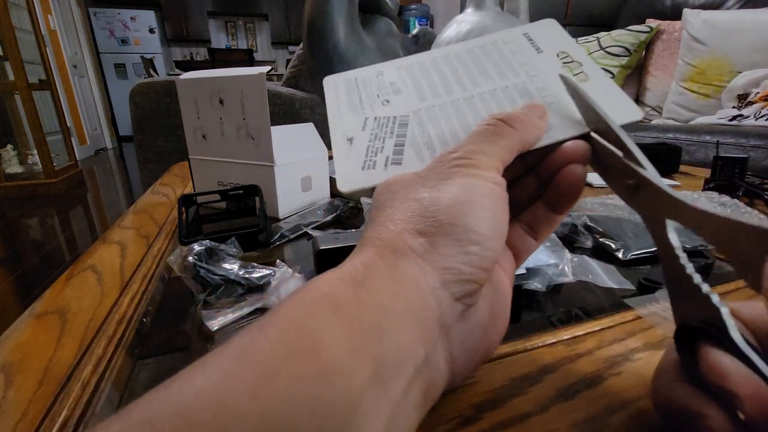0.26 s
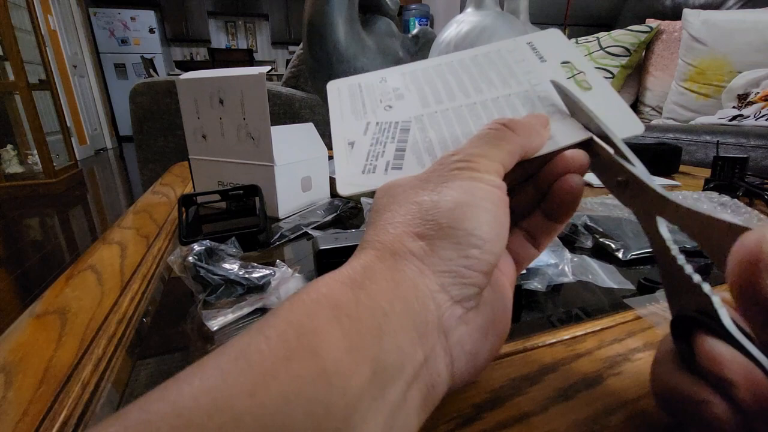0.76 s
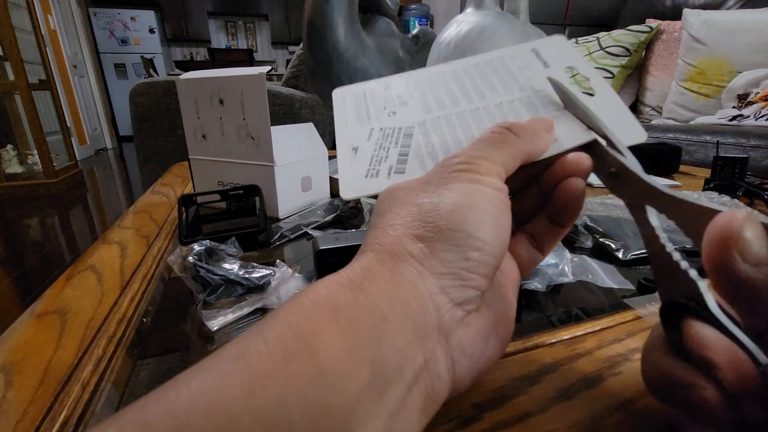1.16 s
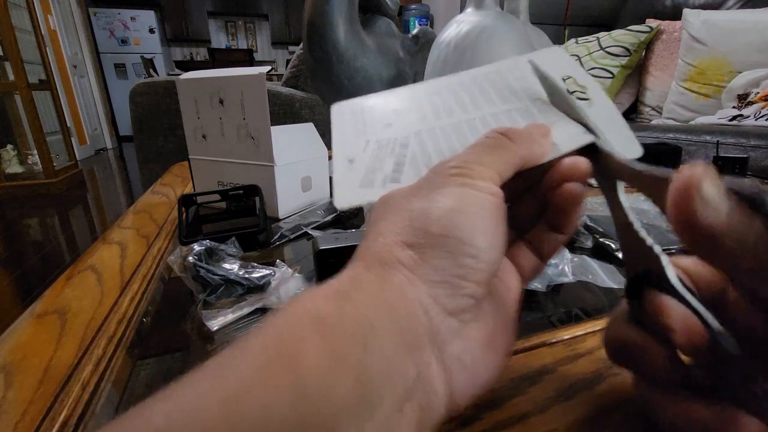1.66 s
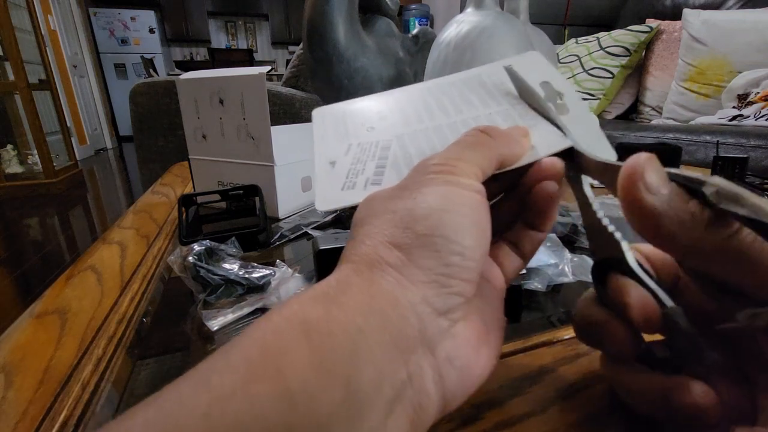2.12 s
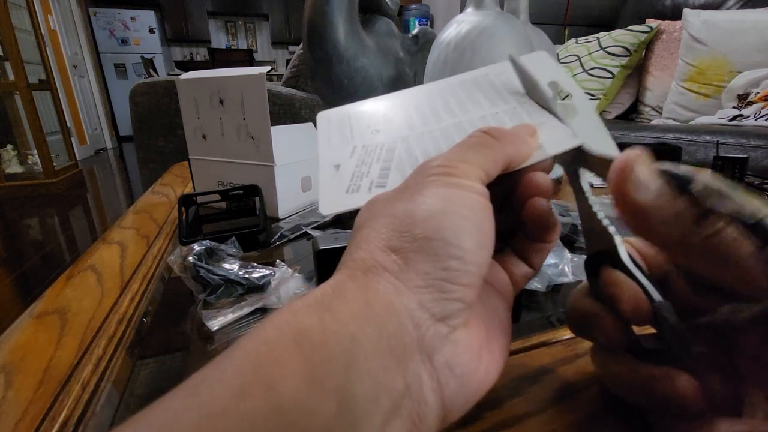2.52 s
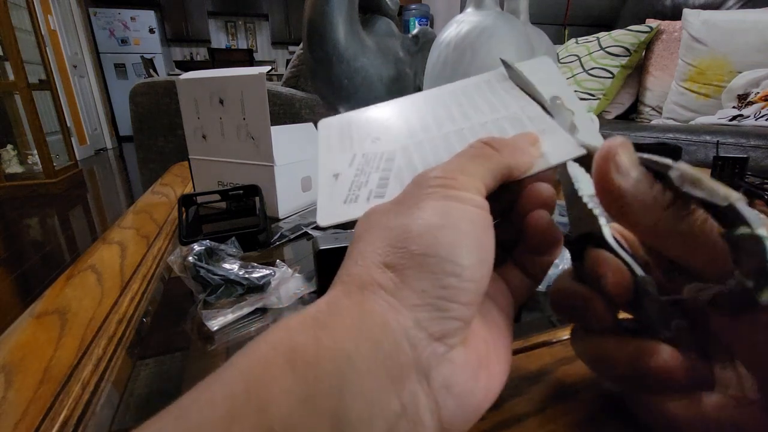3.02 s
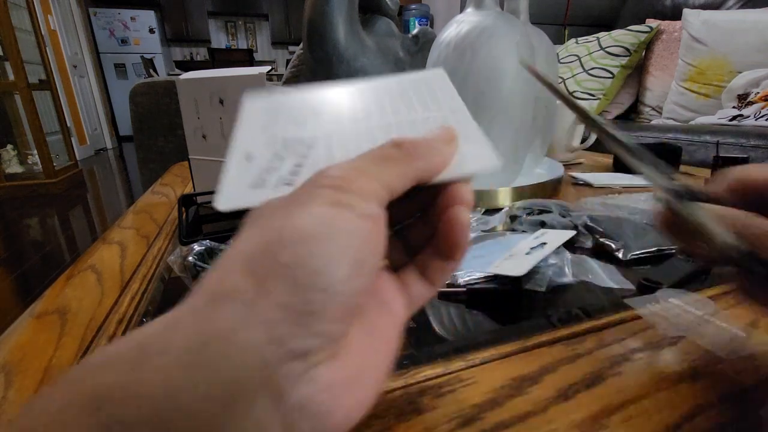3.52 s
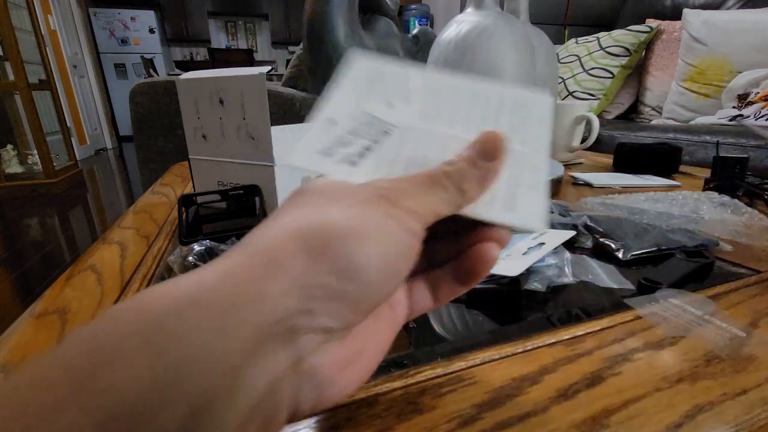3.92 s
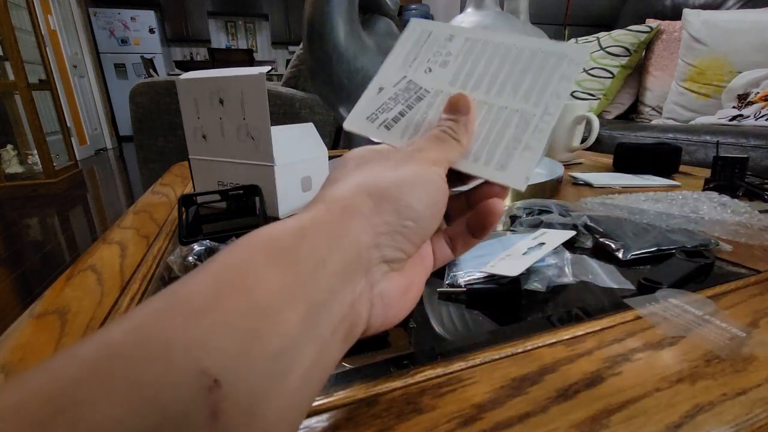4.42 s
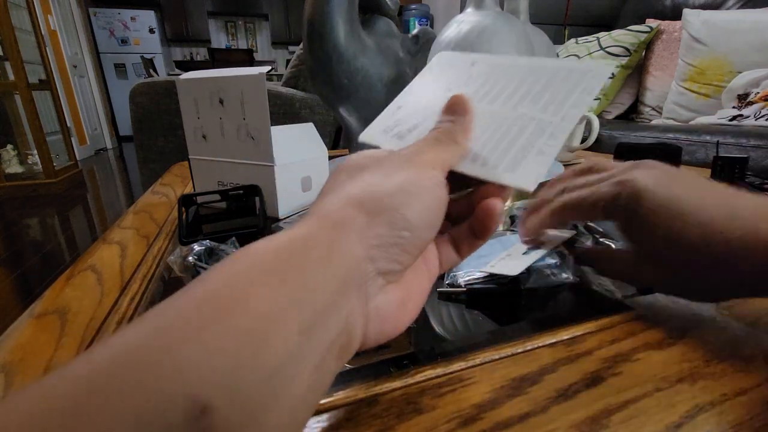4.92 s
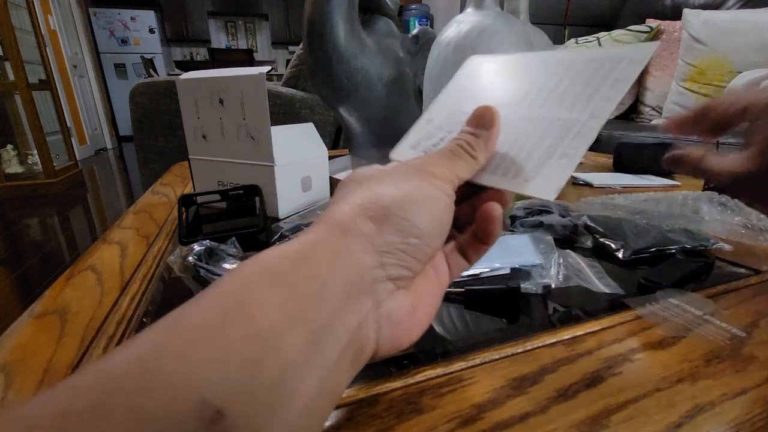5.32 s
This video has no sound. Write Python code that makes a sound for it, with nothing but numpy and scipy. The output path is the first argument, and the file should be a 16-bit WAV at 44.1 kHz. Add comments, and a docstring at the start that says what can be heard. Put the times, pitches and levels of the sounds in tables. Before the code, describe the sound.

A close stereo microphone in a quiet living room, with very low room tone throughout. A faint wrapper crackle comes at the start. From about 0.25 s shears chafe against a card-and-plastic package in dry, gritty bursts, quiet at first. Between about 0.9 and 3.15 s seven short closing strokes creak and rasp like a rapid buzzing tear, alternating with scratchy, slightly squeaky opening scrapes; soft low lurches lie beneath. The stroke near 2.3 s is slower and fainter. At 3.25 s the last fibres part in a hard, bright snap, with card crackle and sliding hands just after. Faint rustles and light touches follow until about 4.4 s. From 4.5 to 4.65 s the shears drop onto the wooden table in a quick, rattling clatter, strongest near 4.58 s. Crisp plastic rummaging bursts out from 4.9 to 5.1 s, then brief crackles, knocks and a brushing sound come around 5.4-5.5 s.

```python
"""A quiet living room, a stereo microphone close to a wooden table; room tone lies under the whole take.
A wrapper crackle comes first, then kitchen shears work through a card-and-plastic package: opening strokes
chafe in bursts of gritty noise, closing strokes creak in stick-slip pulses, and soft low lurches lie under both.
The last stroke snaps through as a few clicks into bright rings, and hands slide over card and wrappers.
The shears drop on the table, striking its decaying modes, and a hand rummages among plastic wrappers."""
import sys
import numpy as np
from scipy import signal
from scipy.fft import rfft, irfft
from scipy.io import wavfile
from scipy.ndimage import uniform_filter1d

SR = 44100
rng = np.random.default_rng(int(sys.argv[2]) if len(sys.argv) > 2 else 0)


def how_loud(loudness_db):
    """Turn decibels into a plain amplitude multiplier (0 dB gives 1, 20 dB gives 10)."""
    steps = np.asarray(loudness_db, float) / 20
    return 10 ** steps


def log_audio(samples):
    """Write samples as a 16-bit WAV file to the path given in sys.argv[1]."""
    # one column per channel
    frames = np.atleast_2d(samples).T
    # limit to full scale, then quantise
    limited = np.clip(frames, -1, 1)
    pcm = np.round(limited * 32767).astype(np.int16)
    wavfile.write(sys.argv[1], SR, pcm)


N = 245637

# colour of card and plastic being rubbed or torn: pitch_hz [Hz], level_db [dB per Hz, relative]
RUB_COLOUR = [(240, -40), (400, -3), (648, -13), (858, -7.5), (1270, -11), (1600, -7.5), (1960, -9.5),
              (2510, -7.5), (3700, -1.5), (4500, -5.5), (5800, -4.5), (6900, -15), (8850, -34.5),
              (15000, -22), (15700, -33), (16500, -47)]


def in_time(tables):
    """Tables of (time in s, value, ..) to a gate that is open inside them and one curve per column."""
    t = np.arange(N) / SR
    times_s, *columns = np.vstack(tables).T
    inside = sum((t >= rows[0][0]) & (t <= rows[-1][0]) for rows in tables)
    gate = uniform_filter1d(inside * 1.0, size=20)
    return gate, [np.interp(t, times_s, column) for column in columns]


def rms_one(x):
    """Scale to rms 1."""
    return x / np.sqrt(np.mean(x ** 2) + 1e-20)


def evened(x):
    """Hold the level at rms 1 over 15 ms."""
    return x / np.sqrt(uniform_filter1d(x ** 2, size=660) + 1e-12)


def band(x, low_hz, high_hz):
    """Butterworth band-pass."""
    sos = signal.butter(2, [low_hz, high_hz], "band", fs=SR, output="sos")
    return signal.sosfilt(sos, x + 1e-18)


def coloured(x, spectrum):
    """Weight noise with a spectrum of (Hz, dB), drawn straight over log frequency."""
    hz, level_db = np.transpose(spectrum)
    bin_hz = np.arange(N // 2 + 1) * SR / N + 1      # 1 Hz up, to keep the log finite
    return irfft(rfft(x) * how_loud(np.interp(np.log(bin_hz), np.log(hz), level_db)), N)


def resonances(x, peaks):
    """Parallel resonators (Hz, width in Hz, dB), signs alternating."""
    out = 0
    for k, (hz, width_hz, level_db) in enumerate(peaks):
        r = np.exp(-np.pi * width_hz / SR)
        a = [1, -2 * r * np.cos(2 * np.pi * hz / SR), r * r]
        ring = signal.lfilter([(1 - r * r) / 2, 0, (r * r - 1) / 2], a, x + 1e-18)
        out = out + (-1) ** k * how_loud(level_db) * ring
    return out


def decay(x, time_s):
    """Let each pulse die out exponentially."""
    return signal.lfilter([1], [1, -np.exp(-1 / (time_s * SR))], x)


def swell_and_die(x, time_s):
    """Let each pulse build up and die away, peaking after about time_s."""
    slow = np.exp(-1 / (time_s * SR))
    return signal.lfilter([3 * (1 - slow)], [1, -2 * slow, slow ** 2], x + 1e-18)


def grit(per_s, spread_db, smooth):
    """Random clicks of uneven size over some smooth noise."""
    sizes = how_loud(spread_db * np.minimum(rng.exponential(1, N), 4)) * rng.choice([-1, 1], N)
    clicks = rms_one(sizes * (rng.random(N) < per_s / SR))
    return rms_one(clicks + smooth * rng.standard_normal(N))


def friction(per_s, spread_db, smooth, ring_db):
    """Grit with the colour of the rubbing; until the shears are through it also sings in the blade modes."""
    # blade modes: pitch_hz [Hz], width_hz [Hz], level_db [dB]
    blade_modes = [(1210, 82, -7), (1735, 120, 3), (2800, 67, -22.5), (3400, 490, 7.5), (3950, 600, -11),
                   (5430, 130, -13.5)]
    cut_through_s = 3.25
    noise = coloured(grit(per_s, spread_db, smooth), RUB_COLOUR)
    cutting = np.arange(N) < cut_through_s * SR
    return rms_one(noise) + cutting * how_loud(ring_db) * rms_one(resonances(noise, blade_modes))


def bursts(rows, fall_ms, high_db):
    """Each friction burst swells while an edge drags and dies when it lets go; fall_ms is the time to drop 12 dB."""
    out = np.zeros(N)
    lead = SR // 25      # samples ahead of the peak
    ms = np.arange(-lead, SR // 15) * 1000 / SR
    noise = friction(9000, 2.5, .8, 0.0)
    mid = evened(band(noise, 1900, 5500))
    high = evened(band(noise, 4500, 20000))
    low = evened(band(band(friction(9000, 2.5, .8, 7.0), 800, 2200), 800, 2200))
    for peak_s, peak_db, low_db, rise_ms in rows:
        start = round(peak_s * SR) - lead
        at = slice(start, start + len(ms))
        burst = low[at] * how_loud(low_db) + mid[at] + high[at] * how_loud(high_db)
        burst = burst / np.sqrt(1 + how_loud(2 * low_db) + how_loud(2 * high_db))
        drop_db = np.where(ms < 0, 12 * (ms / rise_ms) ** 2, 12 * ms / fall_ms)
        out[at] += how_loud(peak_db) * burst * how_loud(-drop_db)
    return out


def rub(hiss, drag):
    """Dense fine grit in two bands, each following its own level curve."""
    noise = friction(4000, 3.0, 1, -8.0)
    return hiss * rms_one(band(noise, 2000, 17000)) + drag * rms_one(band(noise, 400, 2000))


def air():
    """Room tone: steady noise, partly shared by both microphones in the bass, separate above."""
    # room tone colour: pitch_hz [Hz], level_db [dB per Hz, relative]
    tone = [(15, -9.5), (25, -33.5), (43, -12.5), (118, -7.5), (192, -19.5), (232, -14.5), (389, -10),
            (538, -22.5), (687, -17.5), (4240, -31), (6040, -31), (7920, -54.5), (16500, -39.5)]
    shared, left, right = rng.standard_normal((3, N))
    b, a = signal.butter(1, 300, fs=SR)
    sides = []
    for own in (left, right):
        spectrum = rfft(1.1 * signal.lfilter(b, a, shared) + own)
        flat = irfft(spectrum / np.sqrt(uniform_filter1d(abs(spectrum) ** 2, size=200)), N)
        sides.append(coloured(flat, tone))
    return how_loud(-64) * rms_one(np.array(sides))


def crackles():
    """Card and wrappers crackle when handled: short bursts, strong above 4.5 kHz."""
    # crackles: peak_s [s], level_db [dB], body under 2.2 kHz low_db [dB re middle], rise_ms [ms over 12 dB]
    crackle_rows = [(0.0772, -58, -26, 1.2), (3.3551, -44, 0, 8.0), (3.3768, -31, -7.5, 9),
                    (3.5112, -46.5, 1.5, 3.3), (4.0545, -49.5, 8, 3.1), (4.0924, -52.5, 11, 4.1),
                    (4.1367, -48.5, 1, 0.65), (4.3547, -50, -4.5, 2.4), (4.4051, -50.5, 4, 1.6),
                    (4.796, -48, -14.5, 1), (4.8968, -40.5, -6, 1.4), (4.9046, -46, 4.5, 0.76),
                    (4.9198, -33, -9, 1.2), (4.9407, -31.5, -14, 1.096), (4.953, -29, -20, 1.1),
                    (4.9674, -31, -2.5, 2.5), (4.9965, -36.5, -7, 5.5), (5.0276, -31.5, -14, 9.9),
                    (5.0818, -38, 8, 27), (5.3823, -36.5, 3.5, 1.6), (5.3957, -30.5, 16, 1.1),
                    (5.4403, -40, 14, 0.77)]
    return bursts(crackle_rows, fall_ms=3.9, high_db=6.5)


def chafes():
    """The opening blades catch on the cut edge: friction bursts with a squeal below 2.2 kHz."""
    # catches: peak_s [s], level_db [dB], squeal under 2.2 kHz low_db [dB re middle], rise_ms [ms over 12 dB]
    catches = [(0.2377, -45.5, -29, 1.4), (0.27, -48, -10, 0.89), (0.282, -43, -18, 1.9),
               (0.3444, -45, -12, 1.6), (0.368, -44.5, -11, 5), (0.7046, -43.5, -11, 1.1),
               (0.7257, -43, 0, 1), (0.7448, -41.5, -20, 11), (0.757, -46, -1, 2.2), (0.78, -44, -22, 0.57),
               (1.0756, -35.5, -22, 1.1), (1.0881, -36.5, -7, 0.46), (1.1101, -33, -13, 3),
               (1.148, -37.5, -10, 4.3), (1.1646, -48, -27, 1.7), (1.4315, -35, -23, 2),
               (1.4541, -33.5, -13, 2), (1.4731, -38.5, -22, 8.4), (1.4897, -35, -7.5, 2.5),
               (1.5008, -45, -18, 1.1), (1.7843, -38.5, -23, 1.6), (1.8117, -34, -0.5, 8.6),
               (1.8346, -35, 3.5, 6.1), (1.868, -29, 3.7, 1.4), (2.1014, -59.5, 25, 11.6),
               (2.1456, -58, 8, 1.19), (2.174, -51.5, -1, 1.9), (2.2221, -51.5, 0, 1.35),
               (2.5428, -33.5, -4.5, 1.4), (2.5634, -37.5, 3.5, 9.2), (2.5768, -32.5, -6, 2.25),
               (2.6013, -38.5, -3, 2.6), (2.8761, -44.5, 2, 4.05), (2.8925, -33.5, 4.5, 7.3),
               (2.9076, -34, -2.5, 8.3), (2.9291, -31, 4.5, 3.4), (2.9661, -33.5, 0, 0.87),
               (3.1749, -42, -4, 1.2), (3.1957, -37.5, -4, 8.9), (3.2111, -32, -10, 4),
               (3.2475, -17, -3.5, 4.5), (3.2673, -47, 2.5, 2.6)]
    return bursts(catches, fall_ms=6.6, high_db=-1)


def blade_slides():
    """The blades slide open: fine grit that rises, holds and fades."""
    # slides: start_s [s], length_s [s], hiss_db [dB], drag under 2 kHz drag_db [dB]
    slide_rows = [(0.258, 0.1, -66.5, -69.5), (0.527, 0.062, -54, -61.5), (0.716, 0.04, -66, -57),
                  (1.056, .08, -61, -70), (1.428, 0.056, -59, -56), (1.782, 0.054, -58, -59),
                  (2.524, 0.058, -61, -61), (2.86, .13, -65, -55.5), (3.17, 0.081, -53, -50)]
    attack_s, fade_db_per_s = 0.01, 461.5
    t = np.arange(N) / SR
    hiss, drag = np.zeros(N), np.zeros(N)
    for start_s, length_s, hiss_db, drag_db in slide_rows:
        rise = np.clip((t - start_s) / attack_s, 0, 1)
        shape = rise * how_loud(-fade_db_per_s * np.maximum(t - start_s - length_s, 0))
        hiss += how_loud(hiss_db) * shape
        drag += how_loud(drag_db) * shape
    return rub(hiss, drag)


def thumps():
    """Low lurches of the moving hands: lumpy low noise that swells and sinks."""
    # lurches: peak_s [s], level_db [dB], half_length_s [s, falls 24 dB]
    lurches = [(0.34, -57.5, 0.1), (0.6, -63.5, 0.062), (0.757, -55.5, 0.067), (0.953, -61, 0.06),
               (1.13, -52, 0.054), (1.29, -70, 0.068), (1.455, -65.5, 0.072), (2.094, -86, .05),
               (2.327, -70, 0.059), (3.29, -56.5, 0.079), (3.387, -58.5, 0.031), (4.04, -61, .05),
               (4.624, -56.5, 0.11), (5.41, -53.5, 0.084)]
    t = np.arange(N) / SR
    swell = np.zeros(N)
    for peak_s, level_db, half_s in lurches:
        swell += how_loud(level_db - 24 * np.minimum(((t - peak_s) / half_s) ** 2, 20))
    return swell * evened(band(rng.standard_normal(N), 55, 180))


def cuts():
    """The blade sticks and slips through the card; each slip kicks the card and tears a puff of fibres."""
    # closing strokes, a list each: time_s [s], mean slip rate per_s [1/s], card flex_db [dB],
    # blade edge rasp_db [dB]
    strokes = [
        [(0.907, 326, -46.5, -42), (0.955, 246, -46, -52.5), (0.963, 317, -42, -52.5), (0.995, 430, -65, -66)],
        [(1.276, 285, -42, -37.5), (1.304, 393, -35.5, -37), (1.337, 382, -57.5, -43), (1.41, 324, -67, -95)],
        [(1.627, 313, -41, -29), (1.647, 474, -35, -31.5), (1.657, 325, -34, -35.5), (1.681, 182, -62, -42.5),
         (1.72, 113, -64, -66)],
        [(1.979, 317, -44, -41.5), (1.999, 318, -43.5, -42.5), (2.011, 328, -63, -62), (2.03, 290, -63, -51)],
        [(2.23, 138, -63.5, -56), (2.292, 159, -53.5, -59), (2.32, 162, -56, -53), (2.345, 140, -66, -93)],
        [(2.733, 371, -34, -34), (2.757, 510, -64, -33.5), (2.771, 565, -62, -37), (2.791, 325, -42.5, -39.5),
         (2.82, 386, -69, -84)],
        [(3.07, 354, -34.5, -35.5), (3.092, 624, -43.5, -34), (3.1, 690, -61, -35), (3.116, 353, -37.5, -43.5),
         (3.15, 304, -69, -83)],
    ]
    # card modes: pitch_hz [Hz], width_hz [Hz], level_db [dB]
    card_modes = [(310, 95, -1), (710, 130, 5), (1213, 150, 9), (1910, 810, -8), (2810, 230, -3)]
    on, (per_s, flex_db, rasp_db) = in_time(strokes)
    bite = decay(np.maximum(np.diff(on, prepend=0), 0), .011)
    # ragged as the blade bites and when it slows
    rough = np.clip(.15 + bite + (300 - per_s) / 250 * (per_s < 260), 0, 1)

    wobble = rms_one(band(rng.standard_normal(N), 54, 400))
    cycle = np.cumsum(per_s * (1 + .33 * rough * wobble) / SR)
    slips = np.diff(np.floor(np.maximum.accumulate(cycle)), prepend=0)
    slips = slips * how_loud(5 * rough * rng.standard_normal(N))
    puff = decay(slips, 0.001)      # tearing dies out after each slip
    tearing = puff * rng.standard_normal(N)

    # the heavy card follows mostly the mean slip rate, and the ragged slips where the cut is rough
    steady = np.diff(np.floor(np.cumsum(per_s / SR)), prepend=0)
    flex = evened(band(band(steady + 1.2 * rough * slips, 200, 480), 200, 480))
    mid = evened(band(resonances(slips + .15 * rough * tearing, card_modes), 480, 1100))
    edge = evened(band(resonances(slips + (.1 + .15 * rough) * tearing, card_modes), 1100, 2600))
    rasp = mid + how_loud(-1) * edge
    fibres = coloured((puff + .5) * rng.standard_normal(N), RUB_COLOUR)
    hiss = evened(band(fibres, 2800, 17000))
    # fibre hiss follows the flex by a fifth and the rasp by the rest; it is softer in the bite
    hiss_db = rasp_db + 0.2 * (flex_db - rasp_db) - 7 - 5.5 * bite
    return band(on * (how_loud(flex_db) * flex + how_loud(rasp_db) * rasp + how_loud(hiss_db) * hiss), 230, 19000)


def snap():
    """The last fibres part: hard clicks within 3 ms set off broad bright rings."""
    # parting fibres: time_s [s], level_db [dB, relative]
    partings = [(3.2503, -5), (3.2509, 5.5), (3.2514, -1), (3.2533, -25.5)]
    # rings: pitch_hz [Hz], width_hz [Hz], level_db [dB]
    rings = [(2480, 650, -11), (3940, 900, -7), (5490, 800, -4), (6940, 470, -5.5), (9560, 1800, -13.5),
             (13500, 1600, -17.5)]
    clicks = np.zeros(N)
    for k, (time_s, level_db) in enumerate(partings):
        clicks[round(time_s * SR)] = (-1) ** k * how_loud(level_db + 19.5)
    return resonances(clicks, rings)


def sliding_hands():
    """Hands slide over card and wrappers: fine grit following the level of the hands."""
    # passes of the hands, a list each: time_s [s], hiss level_db [dB]
    passes = [
        [(3.255, -50), (3.3, -60.5), (3.34, -70), (3.38, -40.5), (3.42, -57), (3.5, -57.5), (3.54, -59)],
        [(3.64, -63.5), (3.67, -67), (3.7, -89), (3.74, -64.5), (3.78, -83)],
        [(4.89, -51), (4.92, -50), (4.96, -41.5), (5.01, -45), (5.035, -38), (5.085, -45.5), (5.105, -70),
         (5.16, -66.5), (5.22, -75)],
        [(5.375, -45.5), (5.41, -53.5), (5.46, -84), (5.5, -60), (5.515, -38), (5.57, -61)],
    ]
    on, (level_db,) = in_time(passes)
    return rub(on * how_loud(level_db), on * how_loud(level_db - 2.5))


def knocks():
    """Each touch builds up over a few ms and strikes all table modes anew; hard ones favour high modes and rattle."""
    # shears and package touch the table: time_s [s], level_db [dB, relative], hardness_db [dB]
    touches = [(4.017, -56.5, -14.5), (4.053, -67, -4), (4.328, -39, -7.5), (4.493, -21.5, 7.5),
               (4.509, -48.5, -25.5), (4.54, -26, 6.5), (4.565, -33.5, 12.5), (4.581, -8.5, -1.5),
               (4.593, -13.5, -6), (4.605, -14.5, -3.5), (4.635, -14.5, 4.5), (4.655, -27.5, -8.5),
               (5.394, -38, 12), (5.416, -31.5, 4), (5.513, -30.5, 1)]
    # table modes: pitch_hz [Hz], level_db [dB, relative], t60_s [s]
    table_modes = [(100, -8, .12), (160, -5, .08), (190, -8, .05), (240, -1, .035), (278, -1, .035),
                   (335, -1, .035), (450, -16, .03), (680, -9, .03), (760, -9, .035), (890, -3, .03),
                   (960, -4, .03), (1230, -11, .025), (1577, -15, .025), (1976, -16, .03), (2120, -17, .03),
                   (2720, -14, .05), (2880, -14, .035), (3080, -13, .03), (3620, -24, .06),
                   (4140, -27, .015), (5700, -24, .012), (6200, -26, .012)]
    contact_s, rattle_s = 0.0021, 0.00485
    time_s, level_db, hard_db = np.transpose(touches)
    at = (time_s * SR).round().astype(int)
    chance = rng.standard_normal((len(at), len(table_modes)))
    modes = np.zeros(N)
    for k, (hz, mode_db, t60_s) in enumerate(table_modes):
        clicks = np.zeros(N)
        clicks[at] = how_loud(level_db + mode_db - 28.5 + hard_db * (hz > 600) + 2 * chance[:, k])
        ragged = swell_and_die(clicks, contact_s) * rng.standard_normal(N)
        r, w = how_loud(-60 / (t60_s * SR)), 2 * np.pi * hz / SR
        modes += signal.lfilter([0, np.sin(w)], [1, -2 * r * np.cos(w), r * r], ragged)

    hits = np.zeros(N)
    hits[at] = how_loud(level_db + hard_db - 10)
    rattle = swell_and_die(hits, rattle_s) * grit(1800, 1.4, 0.84)
    body = band(band(rattle, 840, 2600), 330, 3640)
    bright = how_loud(-17) * band(rattle, 5400, 6950) + how_loud(-35) * band(rattle, 8000, 16000)
    return band(modes, 93, 10000) + body + bright


def heard(x, lag, left_db, room_db, near_db=-10):
    """Direct sound (lag samples later on the left), weak echoes off hands and table, then the room's tail."""
    room_t60_s, wall_cut_hz = 0.35, 14300
    t = np.arange(SR // 2) / SR
    noise = rng.standard_normal((2, 2, len(t)))
    near = noise[0] * how_loud(-60 * t / 0.007) * (t > .001)
    tail = signal.lfilter(*signal.butter(1, wall_cut_hz, fs=SR), noise[1])
    tail = tail * how_loud(-60 * t / room_t60_s) * (t > .006)
    near, tail = (e / np.linalg.norm(e, axis=1, keepdims=True) for e in (near, tail))
    response = how_loud(near_db) * near + how_loud(room_db) * tail
    bass = signal.lfilter(*signal.butter(1, 350, fs=SR), response)
    response += bass[0] - bass      # long waves reach both microphones alike
    response[0, round(lag)] += how_loud(left_db)
    response[1, 0] += 1
    return signal.fftconvolve(x[None], response, axes=1)[:, :N]


def scene():
    """Handling reaches the right microphone first; cuts and lurches are slightly louder left, the rest right."""
    card = heard(cuts() + thumps(), lag=4, left_db=1.5, room_db=-15.0)
    rubbing = blade_slides() + sliding_hands()
    blades = heard(crackles() + chafes() + rubbing, lag=4, left_db=-4, room_db=-15)
    last_cut = heard(snap(), lag=6, left_db=-6, room_db=-16, near_db=-17)
    table = heard(knocks(), lag=10.2, left_db=-3.0, room_db=-8.0)
    return card + blades + last_cut + table + air()


def band_limit(x):
    """A steep low-pass at the top of the band."""
    return signal.sosfilt(signal.butter(12, 16980, fs=SR, output="sos"), x)


def record(dry):
    """The microphone loses the deepest bass and the top; peaks are rounded."""
    sos = signal.butter(2, [35, 15800], "band", fs=SR, output="sos")
    mix = 1.051 * np.tanh(signal.sosfilt(sos, dry))
    return band_limit(mix)


dry = scene()
out = record(dry)
log_audio(out)
```